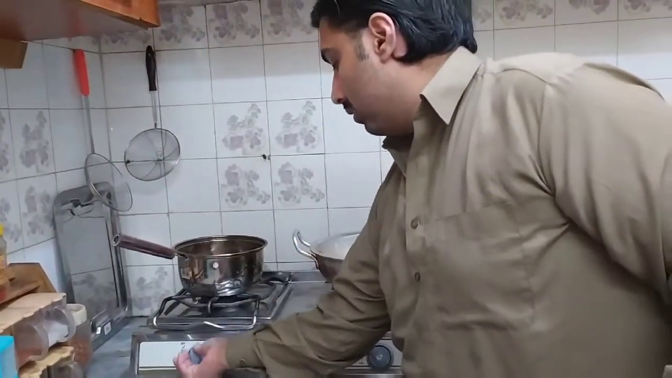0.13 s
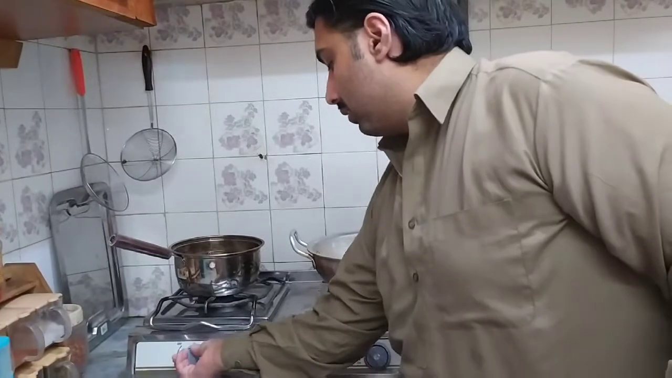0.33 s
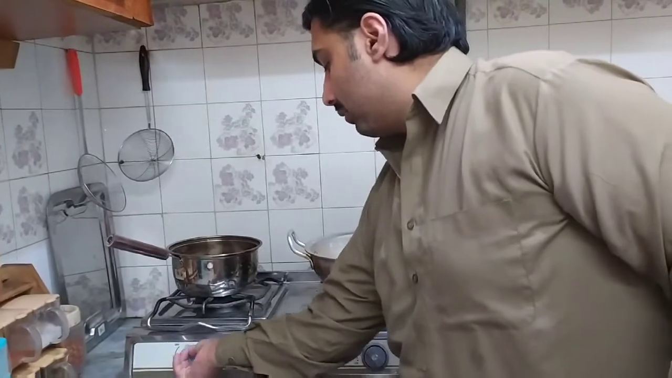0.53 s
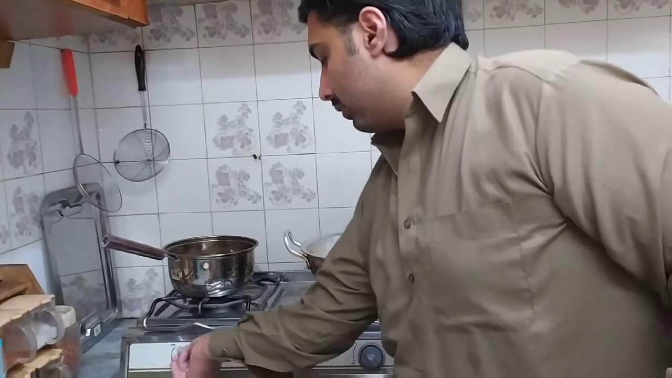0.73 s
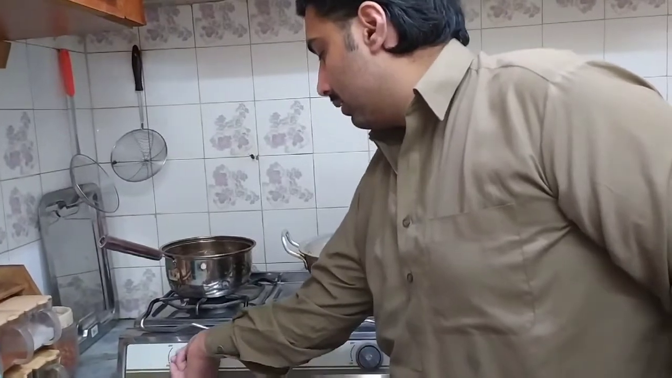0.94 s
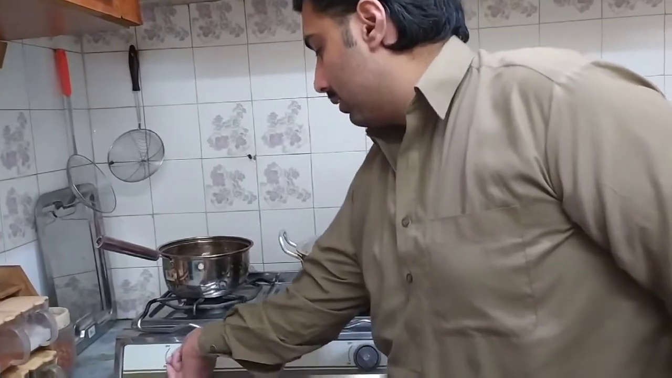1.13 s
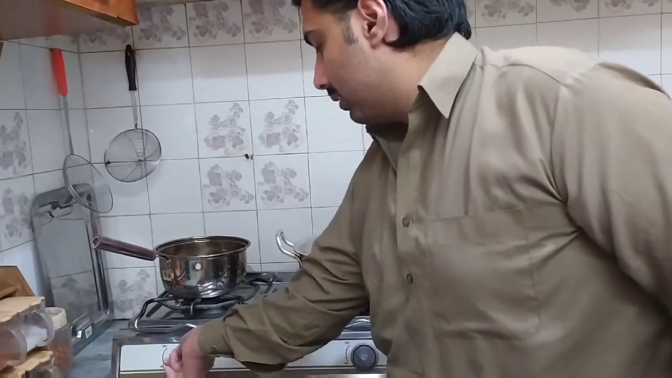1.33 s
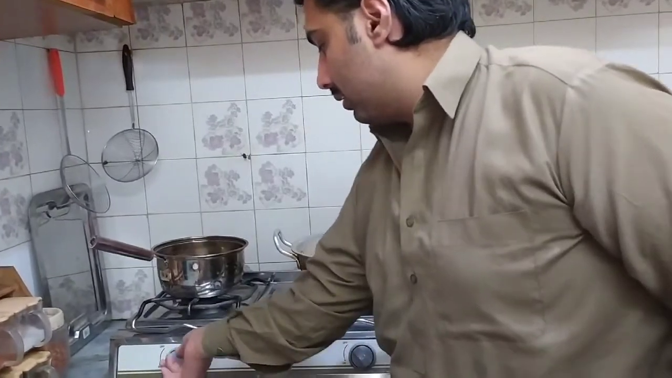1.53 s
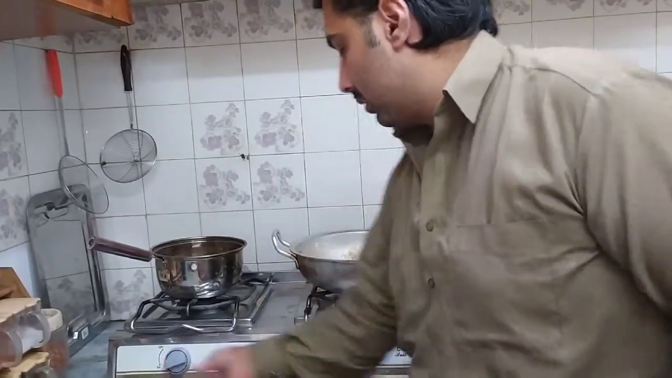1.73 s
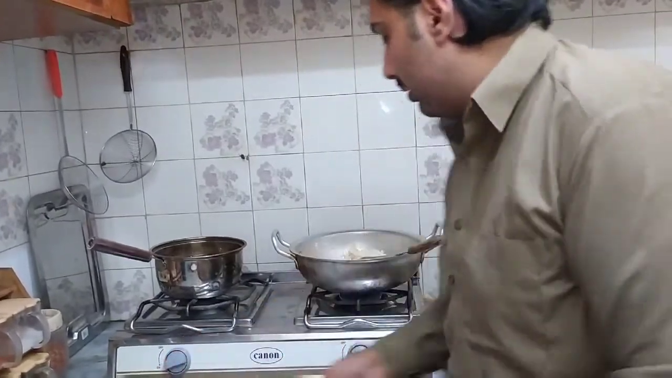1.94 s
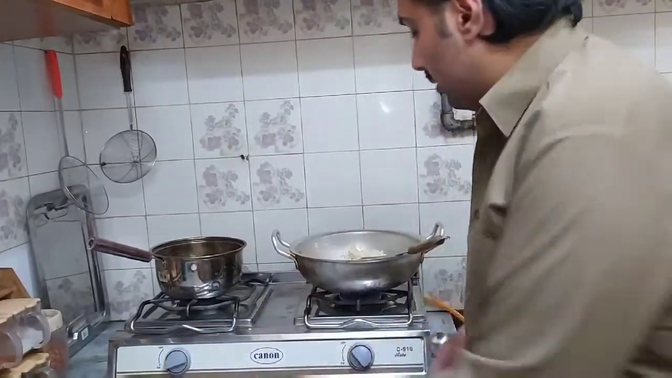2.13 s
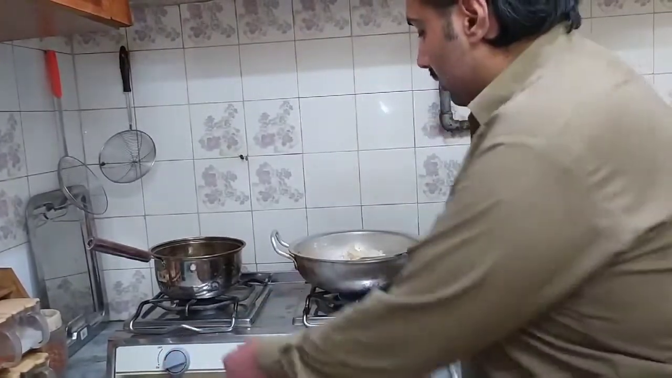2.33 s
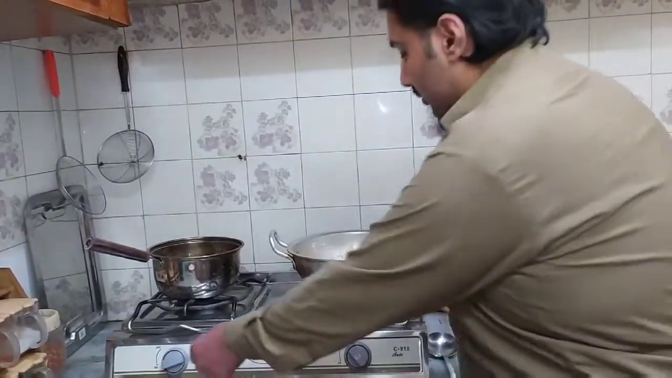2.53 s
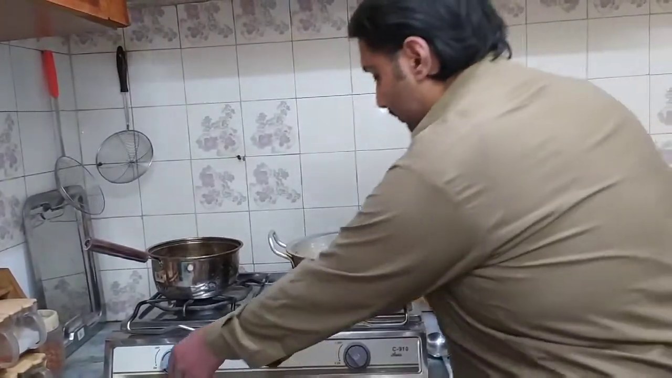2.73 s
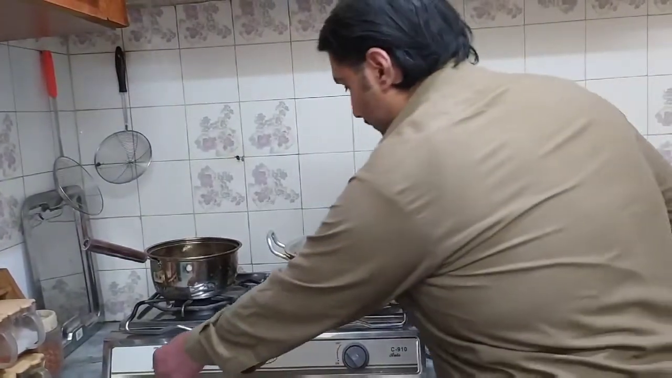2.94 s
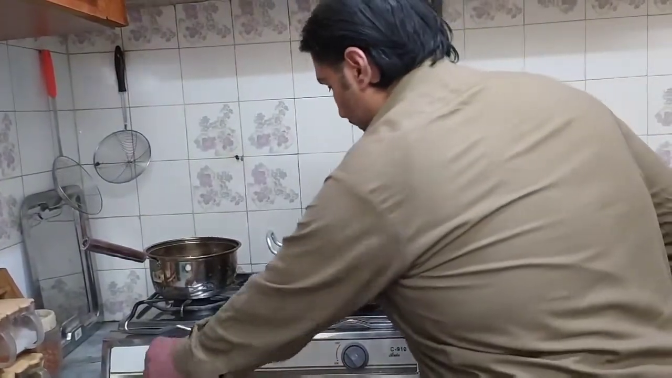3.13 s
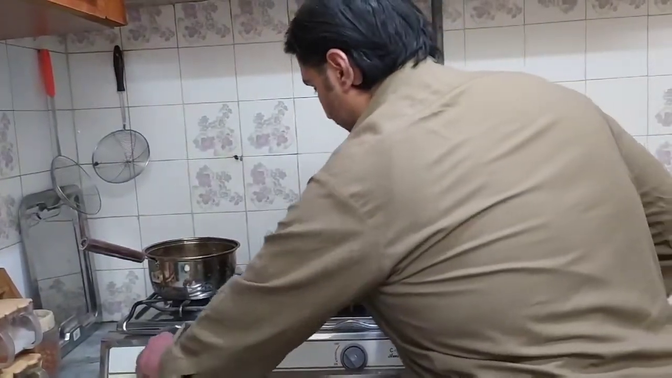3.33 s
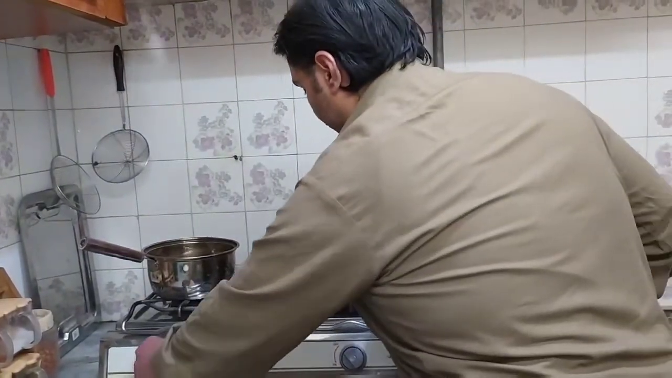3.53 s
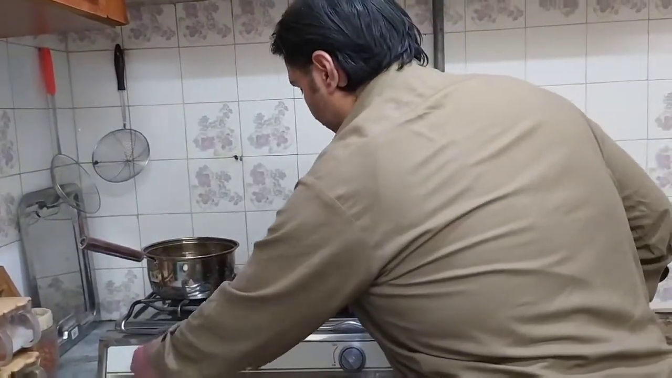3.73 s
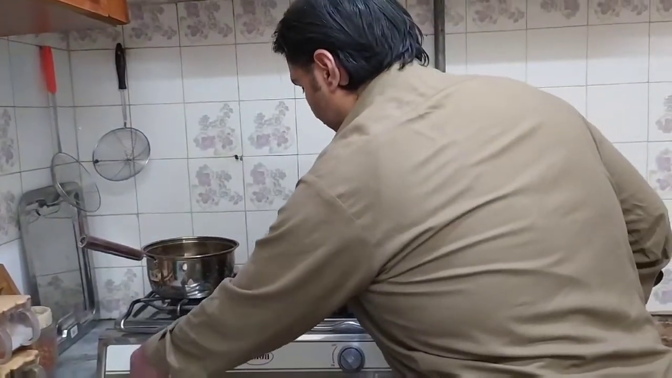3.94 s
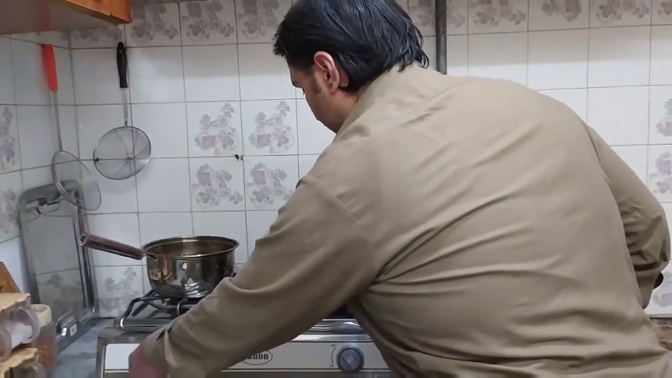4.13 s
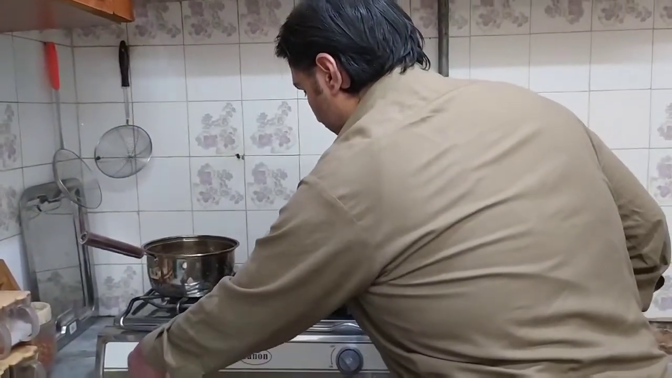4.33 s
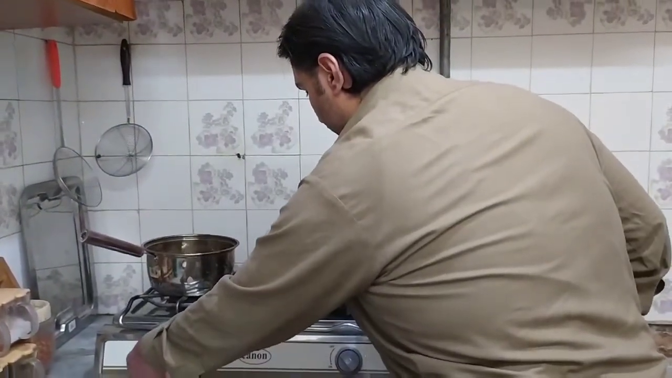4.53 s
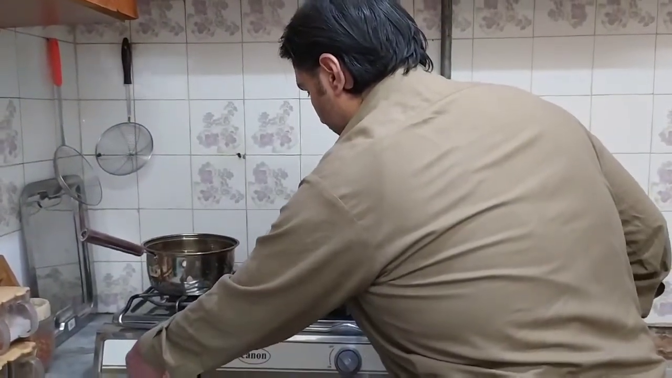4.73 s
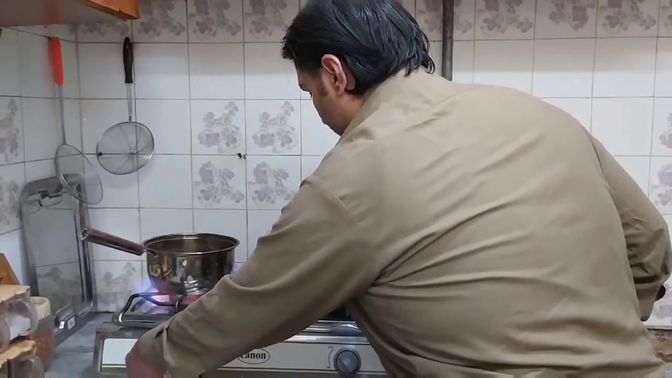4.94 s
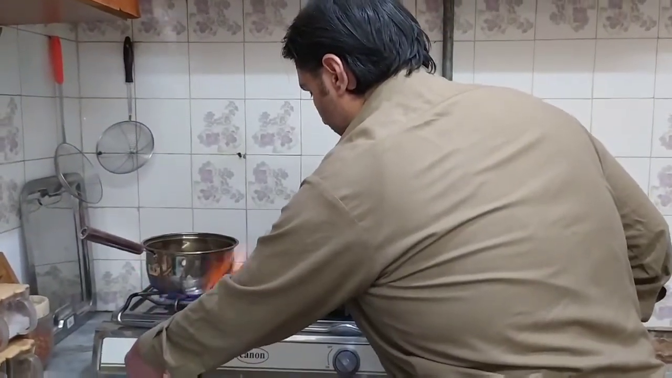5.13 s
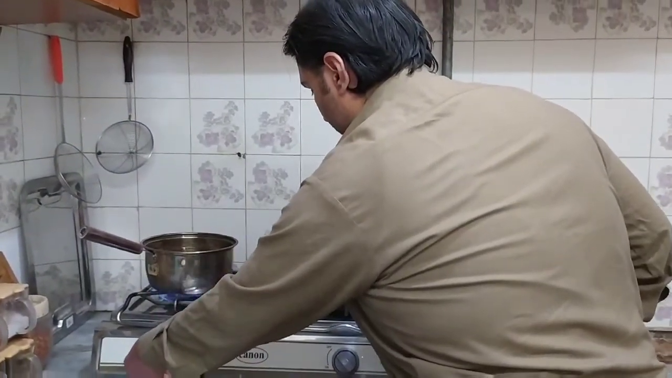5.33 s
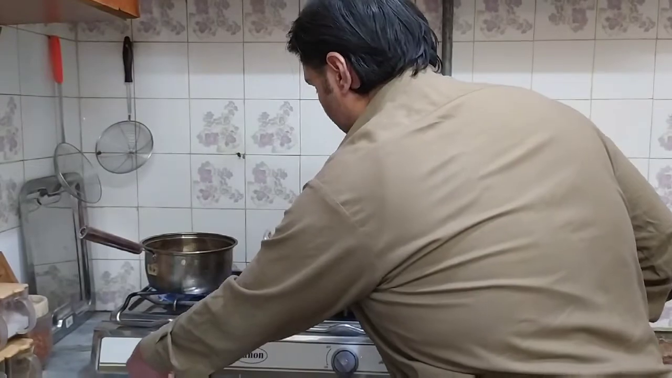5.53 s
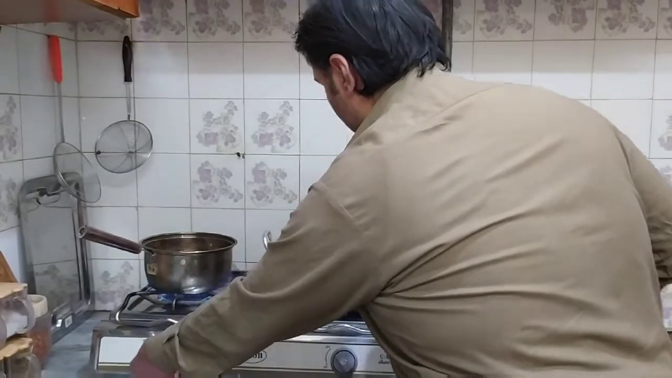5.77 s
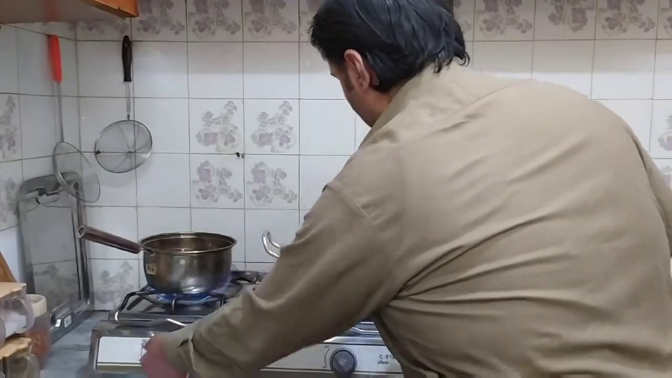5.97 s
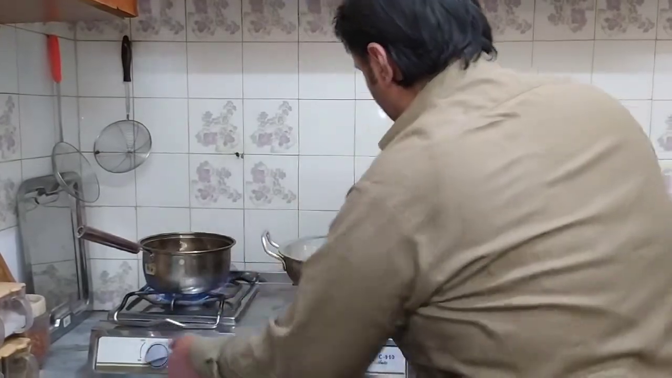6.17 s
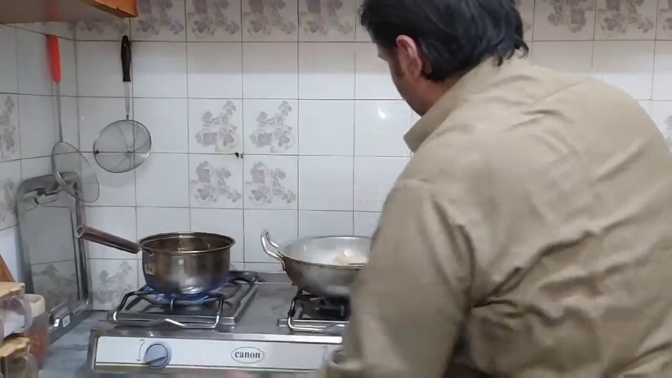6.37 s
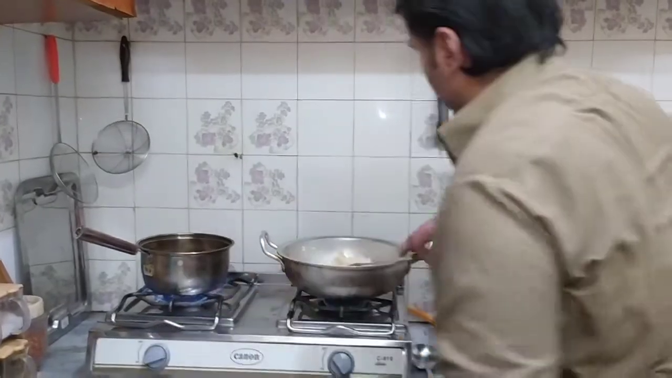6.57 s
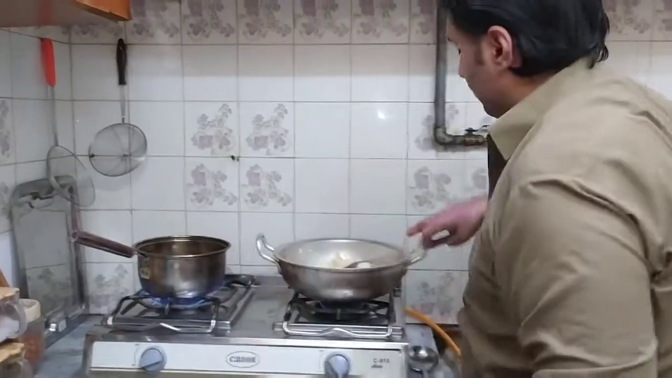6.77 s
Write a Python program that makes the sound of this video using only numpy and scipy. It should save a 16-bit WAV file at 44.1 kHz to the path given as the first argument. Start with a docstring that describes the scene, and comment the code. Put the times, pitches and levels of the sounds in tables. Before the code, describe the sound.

Faint room noise and light air on a nearby microphone. Fingers fumble a plastic knob, a jet opens with shrill hiss, and a spring igniter cracks, rattling the stove. After sleeve movement and knocks the gas shuts off, another crack sounds, and hissing resumes. A final crack sets off a whoomp and breathy burner roar under a pan, which dies down to steady hiss as cloth brushes past. Tiles add short, bright reverberation.

```python
"""A steel table-top gas stove in a small tiled kitchen, over faint room noise and drifting air.
The knob knocks under scuffing fingers; the valve whistles half open and the jet hisses, shrill at first.
The piezo hammer snaps and a sleeve rustles; the valve shuts, a second snap follows, and it opens again.
The third snap lights the gas: it flares, puffs, roars under a saucepan and settles to a hiss.
Blows are shaped noise and decaying modes, gas and flame are filtered noise; the tiles ring."""
import sys
import numpy as np
from scipy import signal
from scipy.fft import rfft, irfft, next_fast_len
from scipy.io import wavfile
from scipy.ndimage import uniform_filter1d, map_coordinates

SR = 44100
rng = np.random.default_rng(int(sys.argv[2]) if len(sys.argv) > 2 else 0)


def transcribe(signal):
    """Save signal, clipped to [-1, 1], as a 16-bit WAV file at the path in sys.argv[1]."""
    frames = np.atleast_2d(signal).T
    limited = np.clip(frames, -1, 1)
    pcm = np.round(limited * 32767).astype(np.int16)
    wavfile.write(sys.argv[1], SR, pcm)


N = 299990
T = np.arange(N) / SR  # time of each sample [s]
BLOW_T = np.arange(SR) / SR  # time within a short sound [s]
LIGHTS_S, SEATS_S = 4.97, 5.61  # the flame catches; it seats itself and starts to quieten


def amp(db):
    """Decibels to gain."""
    return 10 ** (np.asarray(db) / 20)


def unit(x):
    """x at rms 1."""
    return x / np.sqrt(np.mean(x ** 2) + 1e-20)


def along(points, hz):
    """Interpolate (Hz, value) points on a log frequency axis."""
    f, v = np.transpose(points)
    return np.interp(np.log(hz + 1), np.log(f + 1), v)


def wobble(rate_hz):
    """A smooth random curve through rate_hz normal knots a second."""
    knots = rng.standard_normal(int(N * rate_hz / SR) + 4)
    return map_coordinates(knots, [T * rate_hz])


def filtered(x, response):
    """x times a response of frequency."""
    m = next_fast_len(len(x) + SR // 4)
    spectrum = rfft(x, m) * response(np.fft.rfftfreq(m, 1 / SR))
    return irfft(spectrum, m)[:len(x)]


def noise(colour, size=N):
    """Noise of rms 1 with a colour of (frequency [Hz], relative density [dB]) points."""
    return unit(filtered(rng.standard_normal(size), lambda hz: amp(along(colour, hz))))


def resonate(x, peaks):
    """x through parallel bandpass resonances of alternating sign, at rms 1."""
    def bank(f):
        total = 0
        for k, (centre, width, db) in enumerate(peaks):
            damping = 1j * f * width
            total = total + (-1) ** k * amp(db) * damping / (centre * centre - f * f + damping)
        return total
    return unit(filtered(x, bank))


def fade(t, t60):
    """Exponential decay that has lost 60 dB at t60."""
    return np.exp(-np.log(1000) * t / t60)


def bell(x, centre, width):
    """A Gaussian hump of height 1; width is its standard deviation."""
    return np.exp(-.5 * ((x - centre) / width) ** 2)


def stroke(length_s):
    """Envelope of a short rub or push, peaking at half its length."""
    return BLOW_T / length_s * np.exp(-2 * BLOW_T / length_s)


def narrow(hz, width_hz):
    """A noisy tone of rms 1 around a steady or moving pitch."""
    phase = 2 * np.pi * np.cumsum(hz * np.ones(N)) / SR
    return unit(wobble(width_hz) * np.cos(phase) + wobble(width_hz) * np.sin(phase))


def ringing(modes, t):
    """Decaying sines of a struck part, at new strengths and phases for every blow."""
    out = 0
    for hz, db, t60 in modes:
        strength = amp(db + rng.normal(0, 1))
        out = out + strength * fade(t, t60) * np.sin(2 * np.pi * hz * t + rng.uniform(0, 2 * np.pi))
    return out


def at_level(x, db):
    """Scale a short sound so that its loudest 30 ms have this rms level."""
    return x * amp(db) / np.sqrt(uniform_filter1d(x * x, size=1323).max())


def add(track, s, sound):
    """Lay a sound into the track at s seconds."""
    part = track[round(s * SR):][:len(sound)]
    part += sound[:len(part)]


def kitchen(x, direct_db):
    """The direct sound, its first echoes and the dense answer of the tiled walls."""
    # decay of the tiled room: (frequency [Hz], t60 [s])
    tiles = [(120, 0.73), (400, 0.68), (1200, 0.47), (3000, 0.45), (8000, 0.31), (14000, 0.26)]
    # counter and corner walls: (delay [s], level re direct sound, itself capped at -6 dB [dB])
    hob_echoes = [(.0012, -17), (.0031, -8), (.0066, -11), (0.0135, -11.5), (0.018, -18)]
    hz, t, z = signal.stft(rng.standard_normal(SR), SR, nperseg=256)
    decaying = z * fade(t, along(tiles, hz)[:, None])
    response = signal.istft(decaying, SR, nperseg=256)[1]
    response /= np.linalg.norm(response)
    response[0] += amp(direct_db)
    for delay_s, db in hob_echoes:
        response[round(delay_s * SR)] += amp(min(direct_db, -6) + db)
    return signal.fftconvolve(x, response / np.linalg.norm(response))[:len(x)]


def background():
    """Faint room noise, and low noise of air drifting over the microphone."""
    # the quiet kitchen: (frequency [Hz], relative density [dB])
    air = [(20, -1.5), (45, -20), (70, -26.5), (180, -12), (400, -16), (800, -23), (1400, -21.5),
           (3000, -28.5), (6000, -34.5), (9500, -22.5), (12000, -35), (15500, -40)]
    # air on the microphone: (time [s], level [dB])
    draught = [(0, -59), (2.4, -77.5), (6.8, -63.5)]
    draught_db = np.interp(T, *np.transpose(draught))
    gusts = noise([(10, -26), (25, 8), (45, -37), (90, -12.5), (300, -83)])
    return amp(-60.5) * noise(air) + amp(draught_db) * gusts


def handling():
    """The knob clacks, its spindle thuds on the panel, the stove shifts, and fingers and cuff scuff."""
    # the hand grips, pushes and releases the knob:
    # (time of clack [s], thud level [dB], clack level [dB], twice the stroke length [s])
    knocks = [(0.116, -50.5, -52, 0.022), (.325, -70, -65, 0.028), (0.455, -63, -61, 0.039),
              (0.525, -48.5, -65, 0.045), (1.57, -55, -52.5, 0.036), (2.803, -60, -55.5, 0.086),
              (2.946, -51.5, -57, 0.038), (3.031, -50, -45, 0.042), (3.478, -54.5, -69, 0.058),
              (3.713, -61.5, -68, .06)]
    # the spindle against the panel: (frequency [Hz], relative density [dB])
    thud_colour = [(60, -10), (110, -15), (170, -8), (260, -8.5), (420, 9), (570, -2), (760, -1.5),
                   (1050, -8.5), (1400, -31), (4000, -45)]
    # the plastic knob: (frequency [Hz], relative density [dB])
    clack_colour = [(300, -13), (600, -5), (950, 1.5), (1300, 6.5), (1750, 1.5), (2400, -1), (3500, -19.5),
                    (8000, -23.5)]
    # the stove shifts on its feet under the hand: (time [s], level [dB])
    bumps = [(.57, -61), (3.445, -56)]
    # dry scuffs of fingers and cuff: (time [s], level [dB], stroke length [s])
    scuffs = [(0.125, -63.5, 0.093), (0.456, -58, 0.035), (2.328, -47, 0.035), (2.626, -50.5, 0.041),
              (2.795, -41.5, 0.042), (3.644, -58, 0.03)]
    bump_colour = [(50, -28), (80, -4), (120, -4.5), (200, -7), (500, -26), (1500, -49)]
    scuff_colour = [(500, -5), (2000, 0.5), (5000, -6), (9500, 1), (12000, -8.5), (15500, -28)]
    thud_lag_s = 0.0089  # the spindle takes up its slack
    out = np.zeros(N)
    for s, thud_db, clack_db, length_s in knocks:
        clack = noise(clack_colour, SR) * stroke(length_s / 2)
        thud = noise(thud_colour, SR) * stroke(length_s / 2)
        add(out, s, at_level(kitchen(clack, direct_db=-11.5), clack_db))
        add(out, s + thud_lag_s, at_level(kitchen(thud, direct_db=-2), thud_db))
    for s, db in bumps:
        bump = noise(bump_colour, SR) * stroke(0.045)
        add(out, s, at_level(kitchen(bump, direct_db=0), db))
    for s, db, length_s in scuffs:
        scuff = noise(scuff_colour, SR) * stroke(length_s)
        add(out, s, at_level(kitchen(scuff, direct_db=0.5), db))
    return out


def gas():
    """The jet hisses through the mixing tube, shrill at first; the valve whistles only near half open."""
    # turns of the valve:
    # (time half open [s], time constant, negative = shutting [s], whistle level ahead of the room [dB])
    valve = [(0.751, 0.03, -43), (3.201, -0.027, -46.5), (3.812, 0.031, -53)]
    # shrill jet just after opening: (time [s], level before swell and fade [dB], centre [Hz], t60 [s])
    openings = [(.67, -48.5, 10030, 1.4), (3.75, -51.5, 10500, 3.4)]
    # jet noise: (frequency [Hz], relative density [dB])
    hiss = [(200, -3.5), (750, -13), (1200, -1), (1800, 0), (2400, -2), (2800, -6.5), (3200, -20),
            (4600, -28), (5800, -13), (6700, -4.5), (8400, 1.5), (10200, -3.5), (12000, -13.5),
            (15500, -29)]
    # mixing tube: (centre [Hz], width [Hz], relative level [dB])
    tube_peaks = [(1308, 73, 0.5), (2775, 46, -2), (3440, 76, -10.5), (4090, 46, -6.5), (4960, 39, -8.5),
                  (6560, 570, -15), (8320, 330, -7.5)]
    gas_db, lit_db = -52, -2  # steady jet; change once alight
    surge_s, surge_db = 0.09, 5  # time constant and size of the extra pressure, before the aperture scales it
    whistle_hz, glide_hz = 5430, 479  # pitch when half open; rise from shut to open
    focus = 2.1  # higher = sings over less of the travel
    tube_hz, tube_db = 2760, -54.5  # the mixing tube sounds along with each whistle

    flow, whistle, shrill = np.zeros((3, N))
    flow_db = gas_db + lit_db * np.clip((T - LIGHTS_S) / (SEATS_S - LIGHTS_S), 0, 1)
    for s, turn_s, db in valve:
        aperture = (1 + np.tanh((T - s) / (2 * turn_s))) / 2
        flow += aperture - aperture[0]
        if turn_s > 0:  # the pressure stored in the hose escapes first
            flow_db = flow_db + surge_db * aperture * np.exp(-np.maximum(T - s, 0) / surge_s)
        sings = (2 * np.minimum(aperture, 1 - aperture)) ** focus
        pitch_hz = whistle_hz + glide_hz * (aperture - .5)
        valve_tone = amp(db) * narrow(pitch_hz, width_hz=380)
        tube_tone = amp(tube_db) * narrow(tube_hz, width_hz=420)
        whistle += sings * (valve_tone + tube_tone)
    for s, db, hz, t60 in openings:
        age = np.maximum(T - s, 0)
        swell = 1 - np.exp(-(age / 0.07) ** 2)
        shrill += amp(db) * narrow(hz, width_hz=880) * swell * fade(age, t60)
    jet = amp(-2.5) * noise(hiss) + amp(-3.5) * resonate(rng.standard_normal(N), tube_peaks)
    hissing = flow * amp(flow_db + 0.34 * wobble(33)) * jet
    return hissing + shrill + kitchen(whistle, direct_db=3.5)


def igniter():
    """The hammer slips its catch and cracks on the crystal; the blow rattles the pan supports, rings the top."""
    # hammer blows: (time [s], click reference [dB], stove body reference [dB], rattle t60 [s])
    snaps = [(1.1636, -13.5, -15.5, 0.35), (3.2845, -12.5, -36.5, 0.14), (4.9149, -13, -15.5, 0.36)]
    # hammer on the crystal: (frequency [Hz], relative density [dB])
    click_colour = [(300, -33), (1000, -20), (1700, -12.5), (2400, -16.5), (3000, -16), (4600, -12.5),
                    (6500, -9.5), (8000, -5), (9000, 1), (10200, -5.5), (11500, -15), (13500, -22.5),
                    (15700, -29)]
    # stove body: (frequency [Hz], relative density [dB])
    body_colour = [(100, -41), (170, -7), (280, -10.5), (380, 3), (700, -3), (1100, -6.5), (1700, -2),
                   (2700, -1), (3400, -10), (4800, -6.5), (7000, -8), (12000, -39)]
    # the stove top: (frequency [Hz], relative level [dB], t60 [s])
    steel = [(173.4, -24, 1), (403, -15, 0.53), (583, -35, 1), (656, -15, 0.79), (743, -24, 0.98),
             (1018, -11.5, 0.46), (1260, -7, 0.14), (1420, -33, 0.17), (1405, -16, 0.19), (1643, 3, 0.093),
             (1704, -13, 0.76), (1960, -35, 0.82), (2060, -26, 0.39), (2128, 1, 0.091), (2390, -17, 0.29),
             (2550, -22, 0.38), (2565, -10.5, 0.12), (2500, -7, 0.17), (2790, -4, 0.077),
             (2963, -17.5, 0.61)]
    # the hammer and its spring: (frequency [Hz], relative level [dB], t60 [s])
    spring = [(3806, -4, 1), (4250, 6, 0.22), (4883, -9, 0.39), (5545, -18, 0.14), (5900, -15, 0.41),
              (6170, -36, 1), (8170, -29, 0.28), (8200, -31, 0.28), (9100, 17, 0.33), (9300, -7, 0.29),
              (10100, -23, 0.15), (9800, 12, 0.25)]
    contact_colour = [(300, -42), (2000, -39), (9500, 11), (12000, -2), (15700, -5)]
    jolt_colour = [(10, -4), (34, -2), (55, -24), (120, -36), (300, -70)]
    # the thin sheet radiates little below 150 Hz
    sheet_highpass = signal.butter(4, 150, "high", fs=SR, output="sos")
    out, t = np.zeros(N), BLOW_T
    for s, click_db, body_db, rattle_t60_s in snaps:
        # loose parts chatter in uneven bursts
        chatter = amp(8.3 * wobble(363.0)[:SR]) * fade(t, rattle_t60_s)
        crack = noise(click_colour, SR) * (fade(t, 0.022) + amp(-7.0) * chatter)
        # the sheet steel takes a moment to get moving
        swell = 1 - np.exp(-t / 0.00043)
        shake = noise(body_colour, SR) * (fade(t, 0.043) + amp(-13.5) * chatter) * swell
        shake = signal.sosfilt(sheet_highpass, shake)
        catch = noise(click_colour, SR) * fade(t, 0.031)
        contact = noise(contact_colour, SR) * fade(t, 0.017)
        jolt = noise(jolt_colour, SR) * fade(t, 0.46)  # the whole stove rocks on its feet
        add(out, s - .002, amp(click_db - 19) * catch)  # the catch lets go first
        add(out, s, amp(click_db - 2) * contact)
        add(out, s, at_level(jolt, body_db - 24.5))
        add(out, s, at_level(kitchen(crack, direct_db=-7.5), click_db - 5.5))
        add(out, s, at_level(kitchen(shake, direct_db=-9.5), body_db - 5.5))
        add(out, s, at_level(ringing(steel, t) * swell, body_db - 11.5))
        add(out, s, at_level(ringing(spring, t) * swell, body_db - 23.5))
    return out


def sleeve():
    """Cloth slides in tiny catches, swelling and fading with each swing of the arm."""
    # swings of the arm: (time at the fastest [s], relative level [dB], standard deviation [s])
    swings = [(1.67, -51.5, 0.1), (2.137, -57.5, 0.27), (6.387, -53.5, 0.048), (6.659, -42, 0.098)]
    # sliding cloth: (frequency [Hz], relative density [dB])
    cloth = [(150, -31), (300, -11), (550, -6), (1100, -4), (1500, -1), (2300, -20), (3200, -9.5),
             (4700, -11), (8500, -2.5), (11000, -11), (15000, -56)]
    # ringing of the rubbed cloth: (centre [Hz], width [Hz], relative level [dB])
    rub_peaks = [(590, 160, -1), (940, 22, 3), (1453, 59, 6), (1700, 41, 3.5), (2137, 91, 3),
                 (2740, 87, -2), (3150, 58, -0.5)]
    speed = sum(amp(db) * bell(T, s, width_s) for s, db, width_s in swings)
    slide = amp(-6.5) * noise(cloth) + amp(-4) * resonate(rng.standard_normal(N), rub_peaks)
    return slide * speed * amp(1.1 * wobble(200))


def flame():
    """Gathered gas flares and puffs; the lifted flame roars in the gap under the pan, then seats with a hum."""
    # burner and pan: (centre [Hz], width [Hz], relative level [dB])
    cavity = [(89, 19, -9), (119.8, 9.1, -3), (172.3, 16.6, -2), (234, 26, -3), (320, 50, -12.5),
              (428, 19.2, 0.5), (673, 18, -21)]
    # fluttering flame: (frequency [Hz], relative density [dB])
    flutter_colour = [(290, -14), (500, 7.5), (537, -22), (585, 0), (1030, -6), (1390, -1.5), (2100, -2.5),
                      (5160, -21), (8490, -14), (15000, -39)]
    roar_colour = [(50, -27), (85, 6.5), (440, 2), (900, 14.5), (2000, -34)]
    puff_colour = [(4, -25), (11, 10), (20, -13), (45, -25), (110, -6), (250, -68)]
    flare_colour = [(50, -22), (90, -4), (200, -3.5), (400, -2.5), (650, 2.0), (1050, 0.5),
                    (2200, -2), (4000, -10), (9000, -44)]
    spread_s = 0.029  # time to spread round the ring
    roar_base_db, roar_t60_s = -37, 0.59
    flutter_db, flutter_t60_s = -45.5, 0.38  # stops sooner than the roar
    fireball_s, fireball_width_s, fireball_db = 5.06, 0.032, 3.5  # the gathered gas swells the roar

    spread = np.clip((T - LIGHTS_S) / spread_s, 0, 1)
    seated = np.maximum(T - SEATS_S, 0)
    roar_db = roar_base_db + fireball_db * bell(T, fireball_s, fireball_width_s)
    roar = resonate(noise(roar_colour), cavity) * amp(roar_db) * fade(seated, roar_t60_s)
    flutter = noise(flutter_colour) * amp(flutter_db + 0.37 * wobble(100))
    flutter *= fade(seated, flutter_t60_s)
    # the expanding fireball pushes the air once, far below the roar
    puff = noise(puff_colour) * amp(-31) * bell(T, fireball_s, 0.044)
    out = (roar + flutter) * spread * amp(1.27 * wobble(30)) + puff
    t = BLOW_T
    flare = noise(flare_colour, SR) * (1 - np.exp(-t / 0.01)) * fade(t, 0.36)
    hum = np.sin(2 * np.pi * 232 * t) * fade(t, 0.65) * (1 - np.exp(-t / 0.0046))
    add(out, 4.918, amp(-21.5) * flare)
    add(out, 5.56, amp(-32.0) * hum)
    return out


def scene():
    """Everything heard from beside the stove."""
    return (background() + handling() + gas() + igniter() + sleeve() + flame())[None]


def record(dry):
    """Round the highest peaks smoothly towards 0.55, then cut everything from 15750 Hz up."""
    rounded = dry[0] / (1 + np.abs(dry[0] / .55) ** 4) ** (1 / 4)
    return filtered(rounded, lambda hz: hz < 15750)[None]


dry = scene()
out = record(dry)
transcribe(out)
```